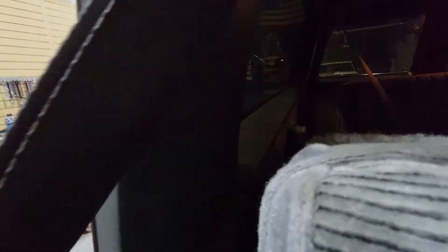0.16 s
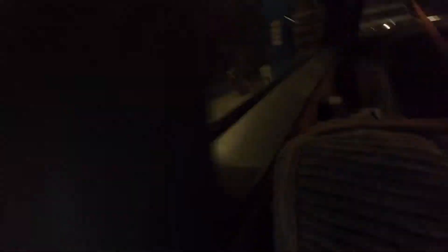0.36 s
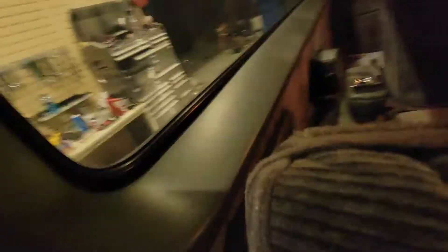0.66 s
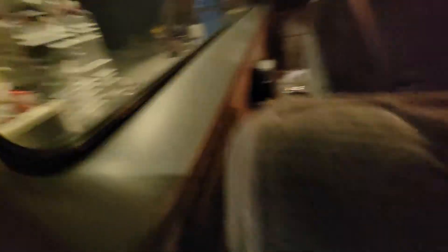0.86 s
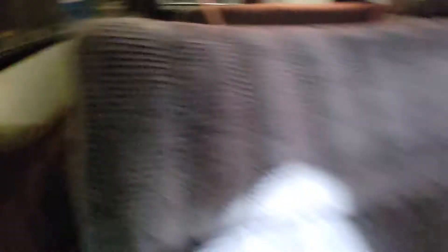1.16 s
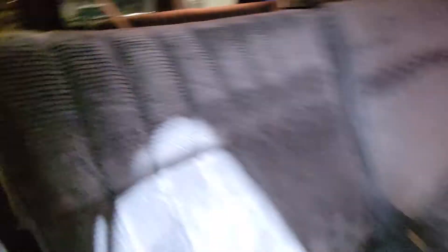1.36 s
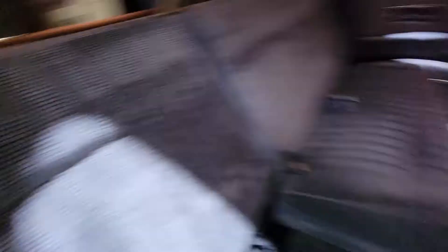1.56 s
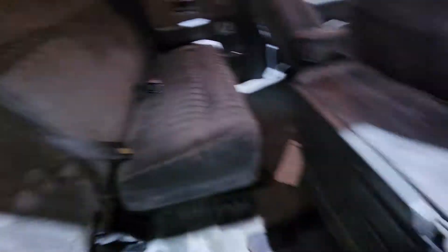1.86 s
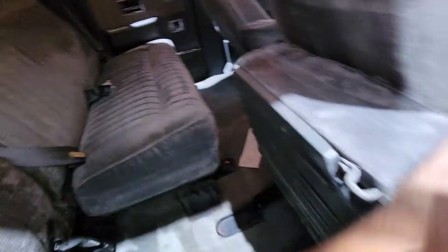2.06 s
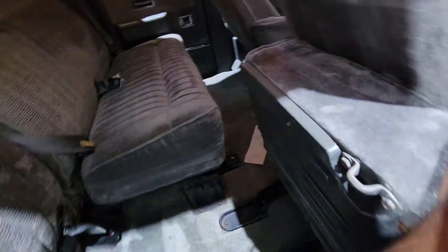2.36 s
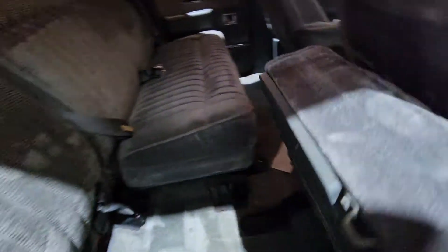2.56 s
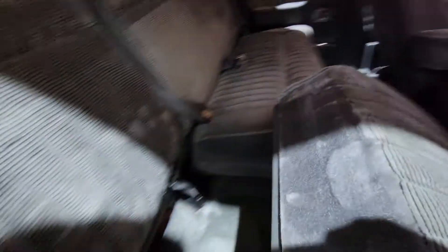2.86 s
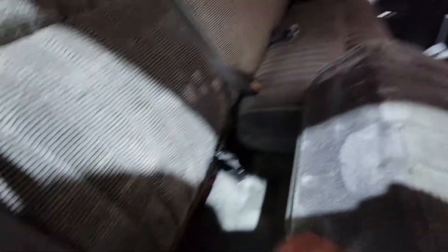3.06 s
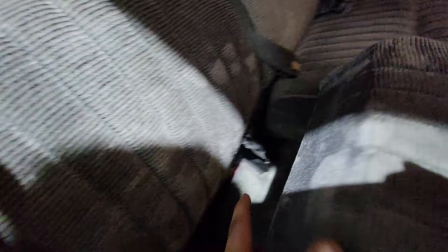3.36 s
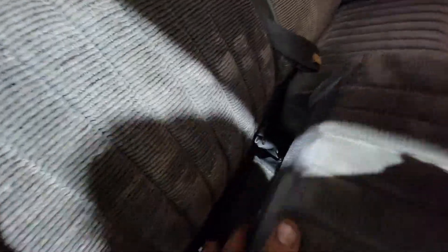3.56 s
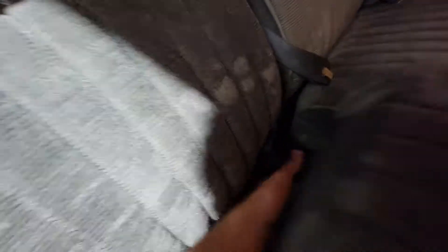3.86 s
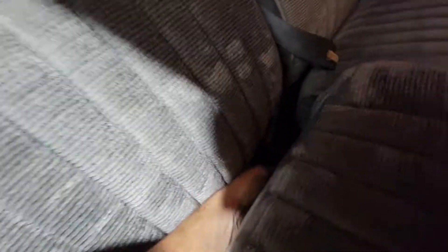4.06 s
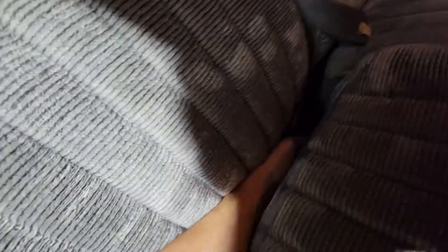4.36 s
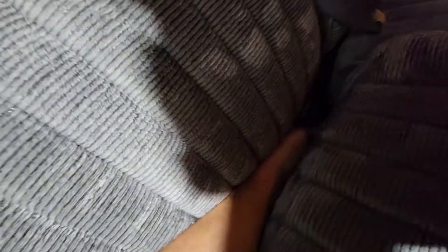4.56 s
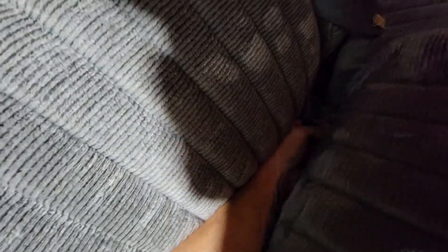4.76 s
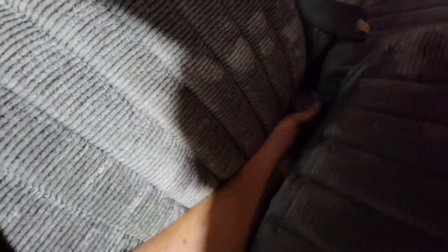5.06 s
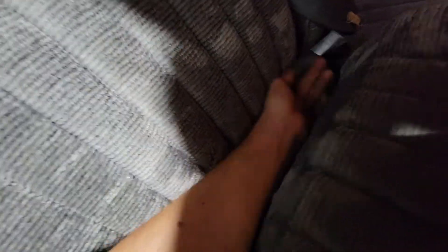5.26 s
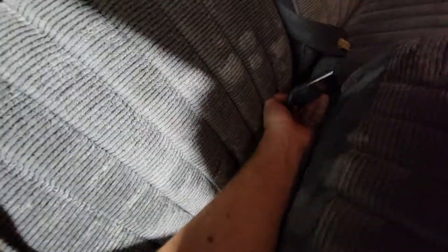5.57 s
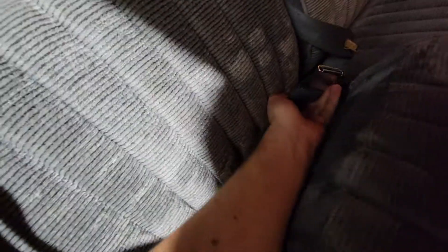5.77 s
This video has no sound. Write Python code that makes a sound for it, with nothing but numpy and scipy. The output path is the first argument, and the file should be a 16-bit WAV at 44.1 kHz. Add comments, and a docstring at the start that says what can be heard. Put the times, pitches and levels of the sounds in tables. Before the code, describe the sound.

Very close stereo sound inside a parked vehicle in a quiet garage. Light upholstery rustle and a dull knock, then a heavy padded seat crashes onto its stops with a deep, decaying boom. A catch clacks hollowly on the left. Quieter handling follows: small knocks, tiny squeaks, a second seat thumping over, and a hand rubbing between cushions, with a firm buckle knock and soft low bumps.

```python
"""Faint rustling of upholstery and a muffled knock come first, inside a parked vehicle in a quiet garage.
Then a padded rear seat drops: its frame crashes, the cabin booms in decaying modes and the catches clack.
A second seat is tipped over with knocks and thin squeaks; a hand digs between the cushions for a belt buckle.
Blows are filtered bursts of noise, cloth is fluttering noise, squeaks are gliding tones;
everything is close to a pair of microphones."""
import sys
import numpy as np
from scipy import signal
from scipy.fft import rfft, irfft, next_fast_len
from scipy.io import wavfile
from scipy.ndimage import uniform_filter1d

SR = 44100
rng = np.random.default_rng(int(sys.argv[2]) if len(sys.argv) > 2 else 0)


def put_to_file(sound):
    """Save the sound as 16-bit audio at rate SR, in the file named by the first command-line argument."""
    columns = np.atleast_2d(sound).T  # one column per channel
    safe = np.clip(columns, -1, 1)
    whole_steps = np.round(safe * 32767)
    wavfile.write(sys.argv[1], SR, whole_steps.astype(np.int16))


N = 261072
# frequency and time axes of a single blow, SIZE samples long
SIZE = 16384
BIN_HZ = np.maximum(np.arange(SIZE // 2 + 1) * SR / SIZE, 1)
AGE = np.arange(SIZE) / SR
# the seat lands
LANDING_S = .5358
# colour of fingers and belt webbing catching on cloth: (frequency [Hz], relative level [dB per Hz])
TUG_TONE = [(300, -2), (900, -7), (1600, 8), (2500, -1), (3600, -36), (7000, -53)]


def from_db(db):
    """Decibels to gain."""
    return 10 ** (np.asarray(db) / 20)


def rms_one(x):
    """Scale to unit power."""
    return x / np.sqrt(np.mean(x ** 2) + 1e-20)


def at_hz(points, hz):
    """Read a spectrum on a log-frequency axis."""
    f, value = np.transpose(points)
    return np.interp(np.log(hz), np.log(f), value)


def drift(rate_hz):
    """Smooth, bounded chance with spread 1, from random knots at the given rate."""
    knots = np.clip(rng.standard_normal(4096), -2, 2)
    return rms_one(np.interp(np.arange(N) / SR * rate_hz, np.arange(len(knots)), knots))


def add(out, s, sound):
    """Mix a short sound in at a time."""
    i = round(s * SR)
    out[..., i:i + sound.shape[-1]] += sound[..., :N - i]


def standing_waves(hz, spacing_hz=55):
    """Crowded peaks and dips of a small enclosed space, at random; spread about 1."""
    knots = np.clip(rng.standard_normal(1024), -2, 2)
    return np.interp(hz / spacing_hz, np.arange(len(knots)), knots)


def swell(s, length, edge_db=10, squareness=2.5):
    """A movement gathers speed and comes to rest: 1 mid-way, edge_db lower at both ends, fading on beyond."""
    off_centre = abs(2 * (np.arange(N) / SR - s) / length - 1)
    return from_db(-np.minimum(edge_db * off_centre ** squareness, 150))


def settling(t60_s=2.2, rise_s=.02):
    """The shaking of cabin and cushions that the landing leaves behind, dying away from 1."""
    age = np.arange(N) / SR - LANDING_S
    return np.clip(age / rise_s, 0, 1) * from_db(-60 * np.maximum(age, 0) / t60_s)


def friction(tone, grain_db, flutter_db, pan_db):
    """Countless tiny slips of uneven size, in surges, coloured by what they shake; rms 1, pan_db to the left."""
    # left-right likeness of the rubbing: (frequency [Hz], correlation [-1 to 1])
    likeness = [(60, 0.24), (200, 0.57), (600, -0.32), (1500, -0.59), (3000, -0.1), (8000, -0.16)]
    size = next_fast_len(N)
    hz = np.maximum(np.arange(size // 2 + 1) * SR / size, 1)
    surges_db = grain_db * drift(500) + flutter_db * (drift(45) + drift(12))
    slips = rng.standard_normal((2, N)) * from_db(surges_db)
    # the ripple of the enclosed space weakens below 400 Hz
    colour_db = at_hz(tone, hz) + 2 * standing_waves(hz) * np.minimum(hz / 400, 1)
    mid, side = rfft(slips, size) * from_db(colour_db)
    alike = np.clip(at_hz(likeness, hz), -.98, .98)
    sign = np.array([[1], [-1]])
    both = irfft(np.sqrt(1 + alike) * mid + sign * np.sqrt(1 - alike) * side, size)[:, :N]
    return rms_one(both * from_db(pan_db * sign / 2))


def upholstery(body_rest_db=-70, rasp_rest_db=-72, hiss_rest_db=-79,
               body_settle_db=-44, rasp_settle_db=-57, grit_db=-7):
    """Cushions shift, sleeves rasp on ribbed cloth, its pile hisses: faint at rest, swelling with each sweep."""
    # sweeps of arms and cushions:
    # (time [s], length [s], cushion level [dB], rasp level [dB], hiss level [dB])
    cloth_sweeps = [(-.05, .24, -54.5, -63, -48.5), (0.31, 0.37, -50, -49.5, -56),
                    (0.761, 0.42, -60, -59, -47.5), (1.504, 1, -64, -62.5, -64),
                    (2.532, 0.66, -62.5, -60, -68), (3.483, 0.34, -52, -59.5, -62.5),
                    (3.78, 0.56, -56.5, -60, -58.5), (4.273, 0.96, -62, -61.5, -75.5),
                    (4.947, 0.38, -54.5, -61.5, -85), (5.193, 0.26, -54, -54.5, -64.5),
                    (5.52, 1, -71, -60.5, -65)]
    # spectra of the three layers: (frequency [Hz], relative level [dB per Hz])
    body_tone = [(90, -25.5), (175, -7.5), (300, -1.5), (500, -5.5), (800, -8.5), (1000, -12),
                 (1800, -40.5)]
    rasp_tone = [(500, -21.5), (1100, 7.5), (2500, 5.5), (3800, -1.5), (5200, -1.5), (7500, -31.5),
                 (11000, -56)]
    hiss_tone = [(4500, -4.5), (6500, 2), (8300, -6), (10000, -0.5), (13000, 4.5), (16000, -1)]
    power = from_db([[body_rest_db], [rasp_rest_db], [hiss_rest_db]]) ** 2 * np.ones(N)
    # the landing stirs the cushions and the rasp, not the hiss
    power[:2] += (from_db([[body_settle_db], [rasp_settle_db]]) * settling()) ** 2
    for s, length, *levels_db in cloth_sweeps:
        movement = swell(s, length, edge_db=10, squareness=2.6)
        power += np.outer(from_db(levels_db), movement) ** 2
    body, rasp, hiss = np.sqrt(power)
    cushions = body * friction(body_tone, grain_db=-1.5, flutter_db=1.2, pan_db=-2.5)
    sleeves = rasp * friction(rasp_tone, grain_db=1.0, flutter_db=1.28, pan_db=-6.0)
    # here and there a rib catches and lets go
    ribs = rasp * from_db(grit_db) * friction(TUG_TONE, grain_db=6, flutter_db=2.5, pan_db=-5)
    pile = hiss * friction(hiss_tone, grain_db=0.2, flutter_db=2.66, pan_db=4.5)
    return cushions + sleeves + ribs + pile


def rumble(rest_db=-53, settle_db=-36, handling_db=-52, handling_s=2.7, handling_length_s=4.2):
    """A low murmur of the cabin, stirred up by the landing and again by the later handling."""
    # murmur of the cabin: (frequency [Hz], relative level [dB per Hz])
    rumble_tone = [(20, -12), (40, -1), (60, 2), (95, 1), (130, -13), (200, -13.5), (350, -62)]
    handling = from_db(handling_db) * swell(handling_s, handling_length_s, edge_db=9, squareness=3)
    shaking = from_db(settle_db) * settling()
    level = np.sqrt(from_db(rest_db) ** 2 + shaking ** 2 + handling ** 2)
    return level * friction(rumble_tone, grain_db=0.4, flutter_db=3.0, pan_db=-2.0)


def causal(db):
    """Minimum-phase response with the given levels: nothing rings before the blow."""
    cepstrum = irfft(np.log(from_db(db)))
    cepstrum[1:SIZE // 2] *= 2
    cepstrum[SIZE // 2 + 1:] = 0
    return np.exp(rfft(cepstrum))


def evened(spectrum, width_hz):
    """Unit power in every broad band, the fine ripple kept."""
    power = uniform_filter1d(abs(spectrum) ** 2, max(3, int(width_hz * SIZE / SR)), axis=-1)
    return spectrum / np.sqrt(power + 1e-18)


def at_microphones(spectrum, db, lag_ms, shade_db=6.5):
    """Colour a blow; for positive lag_ms the right microphone trails, and is louder, most around 2.5 kHz."""
    unit = SR * np.sqrt(.02 / 1000 / 2)
    # a plain delay in the bass; higher up the phase difference is bounded
    phase = np.pi * np.tanh(2 * BIN_HZ * lag_ms / 1000) * at_hz([(3000, 1), (6500, .5)], BIN_HZ)
    side = np.array([[.5], [-.5]])
    shade = at_hz([(200, 0.18), (700, 0.29), (2500, 1.0), (9000, .3)], BIN_HZ)
    balance = from_db(-shade_db * shade * np.tanh(20 * lag_ms) * side)
    sound = irfft(unit * spectrum * causal(db) * balance * np.exp(1j * side * phase))
    # 16 samples of flight time leave room for the microphone that leads
    return np.roll(sound, 16, axis=-1)[:, :SIZE * 3 // 4]


def clatter(t60, rise_s, channels):
    """Spectrum of dense, uneven micro-contacts and reflections building up and dying away; unit energy."""
    noise, unevenness = rng.standard_normal((2, channels, SIZE))
    burst = noise * from_db(2 * unevenness - 60 * AGE / t60) * (1 - np.exp(-AGE / rise_s))
    return rfft(burst / np.sqrt(np.sum(burst ** 2, axis=-1, keepdims=True)))


def blows(rows, padding_db, hollow_db, lag_ms, t60, soft_t60, direct=0.12, scatter=0.56,
          treble_scatter=1.7, rise_s=0.00089, tail_db=-24, tail_t60=0.072, treble_t60_share=0.47, sub_db=-10):
    """Each blow sums a contact, frame rattle (longer if soft) and scatter; padding_db per octave dulls the top."""
    # resonances of seat frame and trim panels: (frequency [Hz], width [Hz], level [dB])
    frame_modes = [(346, 31, 5), (530, 46, 6), (610, 79, -2), (920, 740, -1), (1333, 60, 1.5),
                   (1568, 14, 4.5), (1947, 210, 5), (2180, 190, 2), (2920, 200, 4), (3420, 1200, -1.5),
                   (3950, 28, 7), (7850, 1200, -17.5)]
    # level holds at the pivot: weight acts below it, brightness up to the knee, padding above the knee
    bass_hz, pivot_hz, knee_hz = 284, 616, 2380
    # the hollow of the seat shell, stressed or held back by hollow_db
    hollow_hz, hollow_width_hz = 610, 190
    out = np.zeros((2, N))
    frame_db = sum(db / (1 + (2 * (BIN_HZ - hz) / width) ** 2) for hz, width, db in frame_modes)
    frame_db = frame_db + 1.3 * standing_waves(BIN_HZ)
    frame_db = frame_db + at_hz([(30, sub_db), (110, 0.0), (175, -2), (280, -2.5), (450, -6.5),
                                 (1400, -2.5), (3200, -5.5), (10000, -2.5)], BIN_HZ)
    frame_db = frame_db + hollow_db / (1 + (2 * (BIN_HZ - hollow_hz) / hollow_width_hz) ** 2)
    treble = BIN_HZ ** 2 / (BIN_HZ ** 2 + 4000 ** 2)
    bass = at_hz([(bass_hz, 1), (pivot_hz, 0)], BIN_HZ)
    mid_octaves = np.log2(np.clip(BIN_HZ, pivot_hz, knee_hz) / pivot_hz)
    top_octaves = np.log2(np.clip(BIN_HZ, knee_hz, 11000) / knee_hz)
    for s, db, brightness, weight_db in rows:
        length = np.interp(db, [-50, -20], [soft_t60, t60])
        low_rattle = np.sqrt(1 - treble) * clatter(length, rise_s, channels=1)
        high_rattle = np.sqrt(treble) * clatter(length * treble_t60_share, rise_s, channels=1)
        # short waves reach each microphone by more paths of their own
        scattered = (scatter + treble_scatter * treble ** 2) * clatter(length, rise_s, channels=2)
        blow = evened(direct + low_rattle + high_rattle + scattered, width_hz=720)
        blow = blow + from_db(tail_db) * (1 - treble) * clatter(tail_t60, rise_s, channels=2)
        colour = db + weight_db * bass + brightness * mid_octaves - padding_db * top_octaves
        add(out, s, at_microphones(blow, colour + frame_db, lag_ms))
    return out


def knocks():
    """Hinges and buckle knock through cushions, the frame crashes on its stops, a catch clacks shut on the left."""
    # all three: (time [s], level [dB], brightness [dB per octave], weight of the bass [dB])
    # muffled knocks of hinges, frame and buckle as things are handled
    muffled_hits = [(.074, -41, -3, -1.5), (.409, -50.5, 8.5, 7.5), (.905, -45.5, -10.5, 6.5),
                    (1.286, -53.5, -6, 8.5), (1.732, -57.5, -15, -2), (2.3665, -44, 5, 9),
                    (2.405, -39, -21, 6), (2.42, -38, 0.5, 3), (2.525, -45.5, -19.5, 10),
                    (2.759, -50, -7, 4.5), (2.863, -43.5, -1, -2), (3.038, -60, 1, 13.5),
                    (3.325, -52, -3, 2), (3.477, -52.5, -1, 8), (3.527, -36.5, -4, -3),
                    (3.547, -30, -8.5, -4.5), (3.611, -41, 0, -7), (3.688, -37.5, -1.5, -8),
                    (3.805, -42.5, -9, -1), (3.919, -41.5, -4.5, -8), (4.074, -42.5, -2.5, -12),
                    (4.129, -45, -5.5, -5), (4.256, -49.5, -4, 7.5), (4.594, -49.5, -5, 2),
                    (4.645, -45.5, -0.5, -14), (4.695, -50.5, 5, 11.5), (4.73, -55.5, 4.5, 13),
                    (4.9598, -25, -2, -2.5), (5.196, -33.5, -4.5, -6.5), (5.212, -35.5, 0, 7.5),
                    (5.2505, -40.5, 1, 4.5), (5.354, -46.5, -2.5, 8), (5.519, -46.5, -8.5, 0),
                    (5.7, -68, 7, -2)]
    # the frame against its stops as the seat lands
    frame_crashes = [(.5013, -17.5, 0.5, -7.5), (.518, -12.5, -9.5, -17.5), (.532, -25, -0.5, 12),
                     (.571, -18.5, -1.5, -1), (.586, -22.5, -11.5, -2)]
    # the catch of the seat back strikes and closes
    catch_clacks = [(1.1125, -26.5, 1, -16.5), (1.116, -11, -7.5, -12), (1.129, -31.5, -10, -8)]
    muffled = blows(muffled_hits, padding_db=21, hollow_db=0.5, lag_ms=0.14,
                    t60=.07, soft_t60=.11, rise_s=.001, direct=0.1)
    crash = blows(frame_crashes, padding_db=11, hollow_db=5.5, lag_ms=.27,
                  t60=.1, soft_t60=0.32, rise_s=0.00071, direct=.1)
    clack = blows(catch_clacks, padding_db=12, hollow_db=-3.5, lag_ms=-1.1,
                  t60=0.053, soft_t60=0.082, rise_s=0.002, sub_db=-20, direct=.05)
    return muffled + crash + clack


def snaps(low_db=-14, dip_db=-2, lag_ms=.12):
    """Hard plastic and metal: a sharp click that crunches for a few milliseconds, with a weak spray of reflections."""
    # dry snaps: (time [s], level [dB], top of the treble relative to it [dB])
    dry_snaps = [(0.2685, -56.5, -10), (.5025, -44, 0.5), (0.538, -35, -11), (0.5458, -38.5, -2.5),
                 (0.575, -27.5, -16), (0.5851, -40, -4), (0.7498, -46, -11.5), (0.7956, -52, -9),
                 (.668, -60.5, -19.5), (0.717, -56.5, -34), (0.8202, -62.5, -4.5), (0.851, -55.5, -18),
                 (1.1979, -27.5, -34.5), (2.3662, -58.5, -8), (2.4235, -56, -10.5), (3.3709, -44, -20),
                 (5.2951, -48.5, -17)]
    out = np.zeros((2, N))
    for s, db, top_db in dry_snaps:
        colour = db + at_hz([(400, low_db), (1600, -9.5), (2700, -1),
                             (5500, top_db / 2 + dip_db), (11000, top_db)], BIN_HZ)
        click = evened(1 + 2.5 * clatter(t60=.005, rise_s=.0003, channels=1), width_hz=1200)
        spray = from_db(-18) * clatter(t60=.04, rise_s=.001, channels=2)
        add(out, s, at_microphones(click + spray, colour, lag_ms))
    return out


def strokes(rows, edge_s):
    """Pressure of short sliding contacts that start and stop quickly."""
    t = np.arange(N) / SR
    return sum(from_db(db) * np.clip(np.minimum(t - s, s + length - t) / edge_s, 0, 1)
               for s, length, db in rows)


def scrapes():
    """Hardware rasps on a narrow resonance, the catch slides and stops dead, fingers tug at cloth and webbing."""
    # sliding hardware, the catch, the fingers and webbing: (time [s], length [s], level [dB])
    hardware_rasps = [(.405, .105, -56), (1.28, .06, -50.5), (3.795, 0.129, -54.5)]
    catch_slides = [(1.196, 0.024, -34), (1.316, 0.033, -45.5)]
    cloth_tugs = [(4.735, 0.016, -44.5), (5.07, 0.037, -54), (5.545, 0.034, -53), (5.578, 0.016, -54),
                  (5.645, .021, -52), (5.78, 0.028, -52.5)]
    # spectra of hardware and catch: (frequency [Hz], relative level [dB per Hz])
    hardware_tone = [(1200, -29.5), (2200, -11), (2550, -2.5), (2950, -10), (6000, -32)]
    catch_tone = [(300, -10.5), (1200, -9.5), (2700, -13.5), (5000, -17), (9000, -19), (16000, -31)]
    hardware = strokes(hardware_rasps, edge_s=.015) * friction(hardware_tone, grain_db=3, flutter_db=1, pan_db=-3)
    catch = strokes(catch_slides, edge_s=0.0066) * friction(catch_tone, grain_db=4.0, flutter_db=2.5, pan_db=-1)
    tugs = strokes(cloth_tugs, edge_s=0.011) * friction(TUG_TONE, grain_db=4.5, flutter_db=0.3, pan_db=-8.0)
    return hardware + catch + tugs


def ring(force, modes):
    """Decaying sines set going by a force."""
    out = 0
    for hz, db, t60 in modes:
        # pole radius and angle of a two-pole resonator
        r, w = from_db(-60 / (t60 * SR)), 2 * np.pi * hz / SR
        out = out + from_db(db) * signal.lfilter([0, np.sin(w)], [1, -2 * r * np.cos(w), r * r], force)
    return out


def rebounds(count=4):
    """The seat lands and rebounds on its padding at even intervals, each time softer and shorter."""
    landing_db, landing_contact_s = -10, .0085
    interval_s, loss_db, contact_share = 0.03932, 4, 0.63
    k = np.arange(count)
    contact_s = landing_contact_s * contact_share ** k
    start_s = LANDING_S + interval_s * k - contact_s / 2
    return list(zip(start_s, landing_db - loss_db * k, contact_s))


def boom(pan_db=0.0, lag_s=0.0014):
    """Soft half-sine pushes on the floor set the cabin ringing; the left microphone hears it a little later."""
    # soft bumps of cushions and hands that reach the floor: (time [s], level [dB], contact [s])
    floor_bumps = [(.799, -29, 0.0085), (0.894, -39.5, .0099), (2.369, -43, 0.0015), (2.525, -49, 0.00277),
                   (3.04, -44.5, 0.0091), (3.523, -41.5, 0.0019), (3.99, -28.5, .015), (4.017, -40, 0.0044),
                   (5.217, -27.5, 0.013), (5.258, -23.5, .014), (5.546, -40, 0.011)]
    # modes of the floor pan and the cabin air: (frequency [Hz], level [dB], t60 [s])
    cabin_modes = [(41.04, -1.5, 0.24), (57, 3, 0.075), (81.64, -1, 0.46), (103.9, 3, 0.33),
                   (183, -25.5, 0.54), (226, -38, .2)]
    force, t = np.full(N, 1e-18), np.arange(N) / SR
    for s, db, contact_s in rebounds(count=4) + floor_bumps:
        push = np.sin(np.pi * np.minimum(AGE / contact_s, 1))
        add(force, s, from_db(db) * push / push.sum())
    sound = ring(force, cabin_modes)
    return np.array([np.interp(t - lag_s, t, sound), sound]) * from_db(pan_db * np.array([[.5], [-.5]]))


def panel(pan_db=14.5, low_cut_hz=250):
    """The hollow clunk of the seat back, close on the left; it carries no bass."""
    # the back panel is jolted as its catch closes: (time [s], level [dB])
    panel_jolts = [(1.1179, -19), (1.1308, -25.5)]
    # its modes: (frequency [Hz], level [dB], t60 [s])
    panel_modes = [(327, 6, 0.012), (437, 0.5, 0.038), (565, 5.5, 0.016)]
    force = np.full(N, 1e-18)
    for s, db in panel_jolts:
        add(force, s, from_db([db]))
    low_cut = signal.butter(2, low_cut_hz, "high", fs=SR, output="sos")
    clunk = signal.sosfilt(low_cut, ring(force, panel_modes))
    return clunk * from_db(pan_db * np.array([[.5], [-.5]]))


def squeak():
    """Fast, fitful stick-slip of the turning seat: the pitch holds at first, then slides away."""
    # thin squeaks: (time [s], length [s], starting pitch [Hz], final pitch [Hz], level [dB])
    seat_squeaks = [(2.65, .19, 10100, 7500, -74), (2.83, .16, 4700, 5700, -72),
                    (3.01, .09, 5900, 4700, -76), (3.11, .07, 5200, 5400, -76),
                    (3.23, .04, 5300, 4900, -75)]
    out, t = 0, np.arange(N) / SR
    waver = 1 + .016 * drift(600) + .016 * drift(35)
    for s, length, start_hz, final_hz, db in seat_squeaks:
        hz = start_hz + (final_hz - start_hz) * np.clip((t - s) / length, 0, 1) ** 1.5
        tone = np.exp(2j * np.pi * np.cumsum(hz * waver) / SR)
        out = out + from_db(db) * swell(s, length, edge_db=13, squareness=5) * tone
    grip = from_db(3 * drift(25))
    # the two microphones hear it a quarter cycle apart
    return grip * np.sqrt(2) * np.array([out.imag, out.real])


def scene():
    """Cloth, cabin and blows together."""
    return upholstery() + rumble() + knocks() + snaps() + scrapes() + boom() + panel() + squeak()


def record(dry, low_cut_hz=32, top_cut_hz=15950):
    """The microphones lose the deepest bass, the highest peaks are clipped and the top is cut."""
    heard = signal.sosfilt(signal.butter(3, low_cut_hz, "high", fs=SR, output="sos"), dry)
    top_cut = signal.ellip(10, .1, 80, top_cut_hz, fs=SR, output="sos")
    return signal.sosfilt(top_cut, np.clip(heard, -1, 1))


dry = scene()
out = record(dry)
put_to_file(out)
```